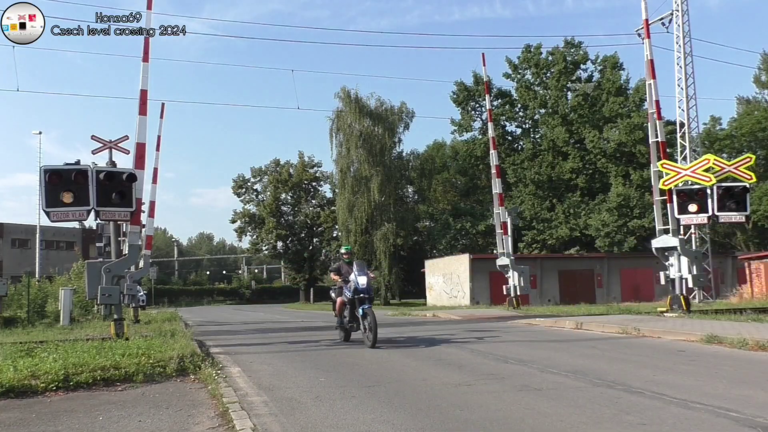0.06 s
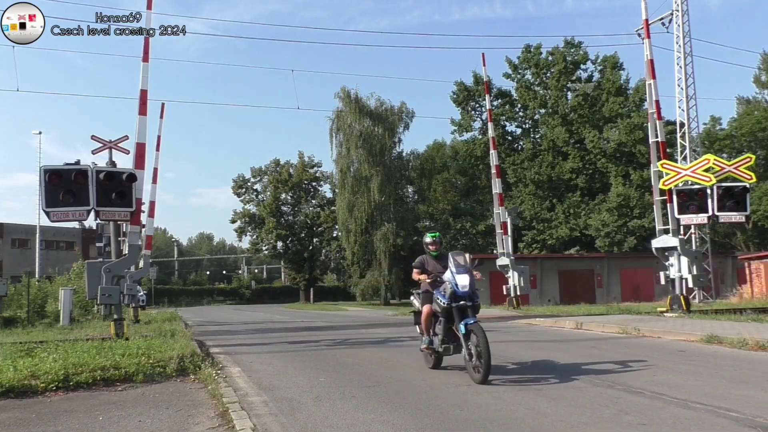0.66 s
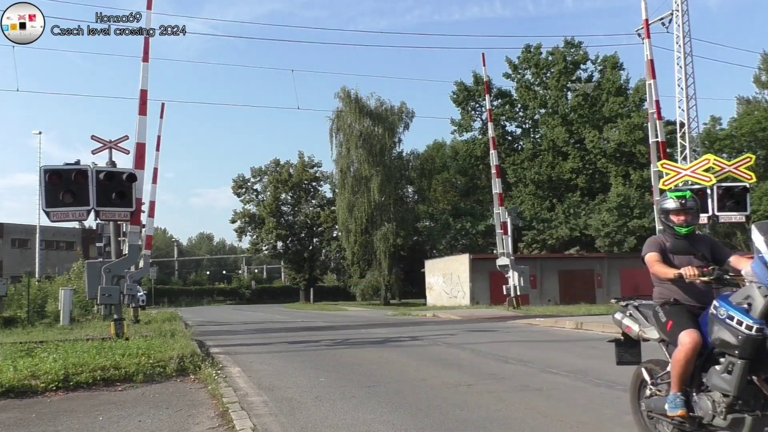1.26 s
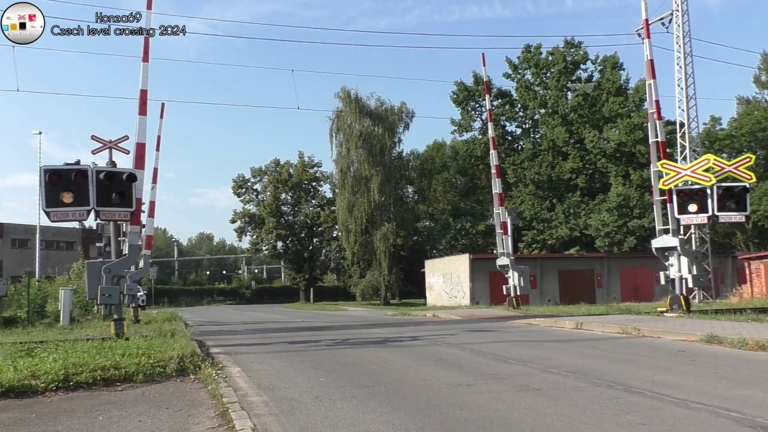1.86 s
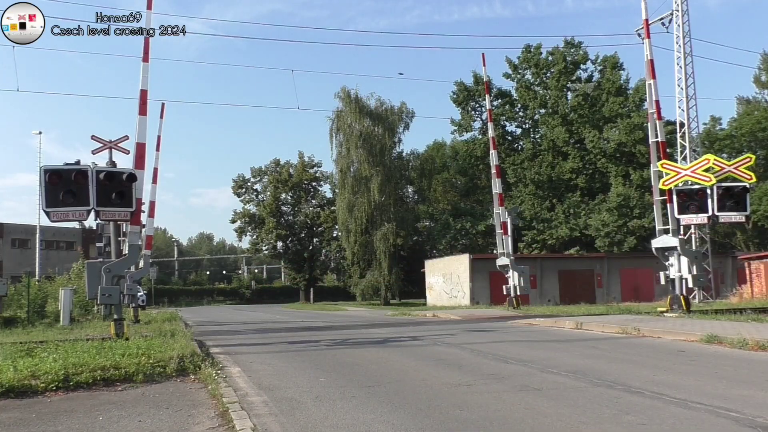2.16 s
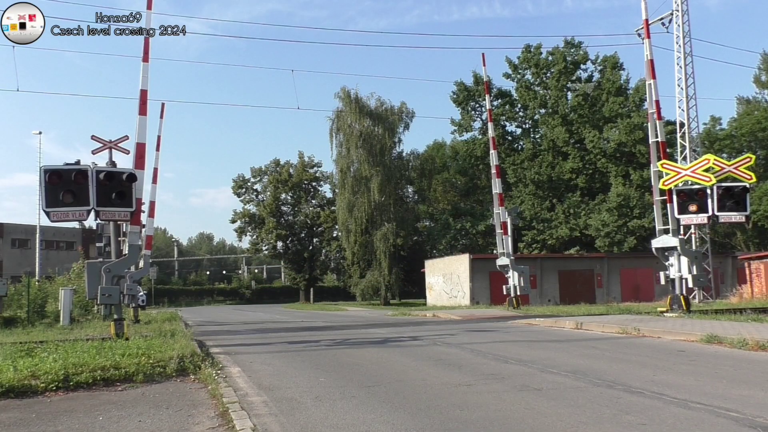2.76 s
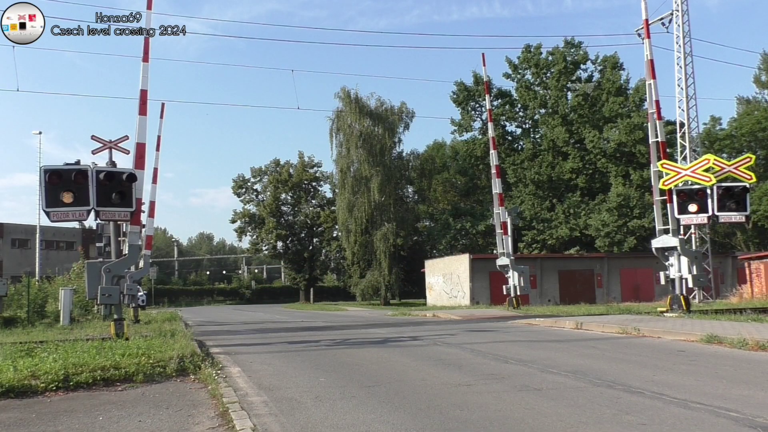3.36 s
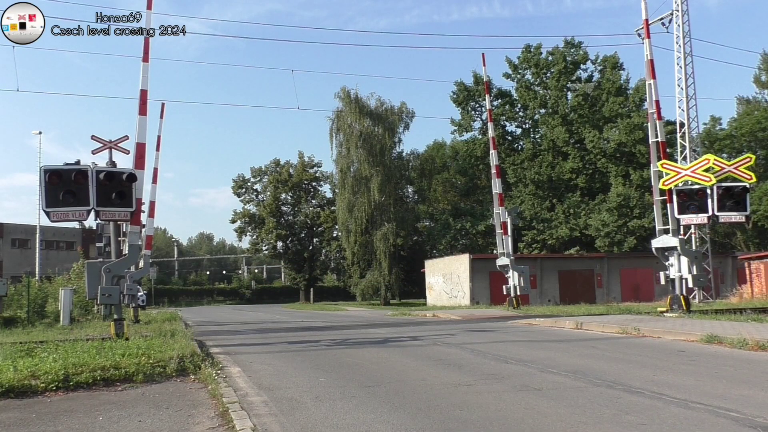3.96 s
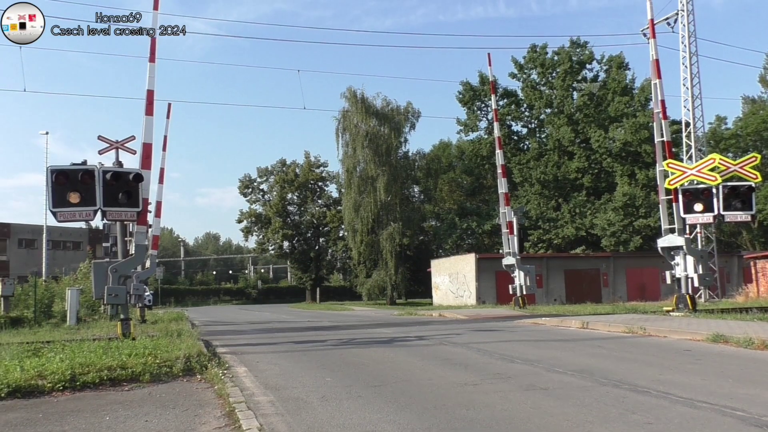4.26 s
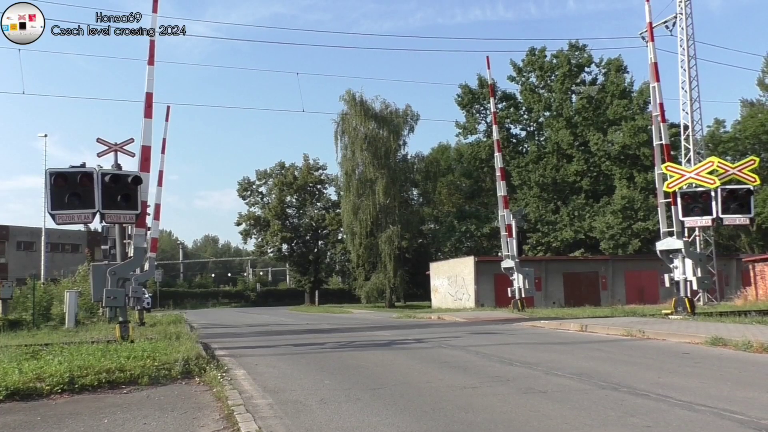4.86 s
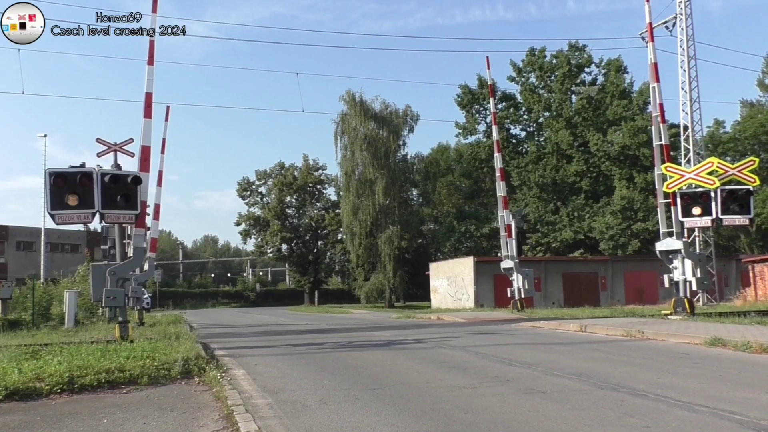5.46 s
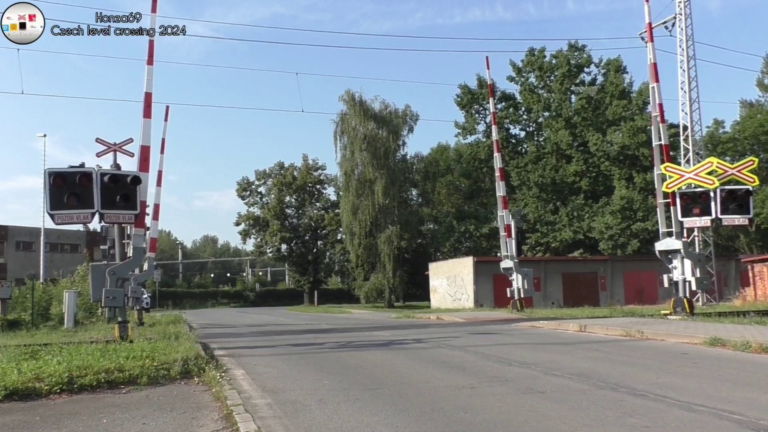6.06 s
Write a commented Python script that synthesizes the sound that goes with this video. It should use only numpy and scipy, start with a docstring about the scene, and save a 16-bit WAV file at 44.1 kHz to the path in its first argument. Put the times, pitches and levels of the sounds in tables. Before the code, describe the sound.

A single-cylinder motorcycle passes close behind a fading car, backfires briefly and rides off while another car approaches from the left.

```python
"""A car rolls by at a level crossing, and just behind it a single-cylinder motorcycle thumps past on the
right, each firing a gas puff that excites the resonances of pipe and silencer; single firings spit.
Near 1.8 s the rider shuts the throttle: unburnt fuel pops in the exhaust and loose metal clinks.
Then the chain takes the load and the bike pulls away, still spitting at first.
From about 3 s the tyre roar of another car grows on the left."""
import sys
import numpy as np
from scipy import signal
from scipy.fft import rfft, irfft, next_fast_len
from scipy.io import wavfile

SR = 44100
rng = np.random.default_rng(int(sys.argv[2]) if len(sys.argv) > 2 else 0)


def transcribe(signal):
    """Save signal, clipped to [-1, 1], as a 16-bit WAV file at the path in sys.argv[1]."""
    frames = np.atleast_2d(signal).T
    limited = np.clip(frames, -1, 1)
    pcm = np.round(limited * 32767).astype(np.int16)
    wavfile.write(sys.argv[1], SR, pcm)


N = 269892
TIME = np.arange(N) / SR

BIKE_PATH = dict(nearest_s=1.846, distance_m=1.93, speed_m_per_s=7.66)
# the rider's hand: t/s, throttle opening (0-1)
THROTTLE = [(0, 0.87), (.36, 0.7), (.47, 0.98), (.75, 0.81), (1.25, 0.85), (1.77, 0.42), (1.815, 0),
            (2.07, 0.1), (2.12, 0.49), (2.35, 0.58), (2.45, 0.71), (2.66, 0.82), (2.92, 1), (3.06, 0.36),
            (3.6, 0.33), (4.02, 0.47), (4.08, 0.73), (4.67, 0.85), (4.73, 0.7), (4.86, 0.36), (4.93, 0.84),
            (6.1, 0.73)]
# modes of the silencer's shell: f/Hz, bandwidth/Hz, level/dB
SHELL_MODES = [(510, 55, -29), (570, 40, -3), (625, 26, 0), (700, 32, -15)]
# modes of the sprockets and chain guard: f/Hz, bandwidth/Hz, level/dB
SPROCKET_MODES = [(2420, 140, -1), (3450, 65, -5), (4070, 61, 0), (4620, 70, -4), (5340, 71, -0.5),
                  (5750, 30, -8), (7770, 110, -7.5), (8650, 100, -11)]
# spectrum of turbulent gas leaving the pipe: f/Hz, level/dB
CRACK_SPECTRUM = [(30, -30), (400, -35), (750, 4), (1200, 8.5), (1600, 8.5), (2300, 0), (4200, -5),
                  (8000, -24), (16000, -39)]


def exhaust(fired, open_ms=1.783, shut_ms=5.65, shut_db=-11.5, sound_m_per_s=343):
    """Pulse excitation: each firing sends a puff down the pipe; changing delay gives a Doppler shift."""
    # puff strength on full throttle: t/s, level/dB
    full_throttle = [(.05, -12.5), (.2, -11.5), (.36, -7.5), (.62, -11.5), (1.25, -8.5), (1.55, -8.5),
                     (1.77, -10), (1.82, 2), (1.96, -2), (2.15, -12), (2.66, -14), (2.9, -17.5),
                     (3.08, -23), (3.2, -19), (3.55, -21), (3.68, -17.5), (3.85, -18), (3.99, -19),
                     (4.08, -17.5), (4.8, -19), (5.0, -17), (6.1, -17)]
    shut = 1 - in_time(THROTTLE, fired)[0]
    facing = passing(**BIKE_PATH, at=fired)[2]
    chance = rng.standard_normal((len(fired), 2))
    # on a shut throttle the puffs are weaker, more ragged and longer
    level_db = in_time(full_throttle, fired)[0] + shut * (shut_db + 1.5 * chance[:, 0])
    width_ms = open_ms * (shut_ms / open_ms) ** shut * (1 + 0.042 * chance[:, 1])
    width_ms *= 1 + 0.024 * facing  # the pipe points backwards: duller from ahead
    travel_s = passing(**BIKE_PATH)[0] / sound_m_per_s
    sent = fired - np.interp(fired, TIME, travel_s)
    pipe = pipe_and_silencer(puff_train(sent, level_db, width_ms))
    shell, clicks = wavefronts(sent, fired)
    pipe, shell = later(pipe + clicks, travel_s), later(shell, travel_s)
    scattered = surroundings(from_db(-23) * pipe + from_db(-10) * shell)
    return panned(pipe, 1.5) + panned(shell, 0) + scattered


def firing_times():
    """Phase is the integral of frequency: one firing for each completed engine cycle."""
    # firing rate: t/s, f/Hz
    firing_rate = [(0.0, 16.39), (0.26, 11.8), (0.5, 21.79), (0.57, 24.0), (0.76, 21.27), (1.2, 23.72),
                   (1.75, 26.57), (1.8, 20.63), (1.88, 22.85), (1.96, 19.46), (2.16, 17.4), (2.31, 20.94),
                   (2.35, 16.66), (2.48, 19.56), (2.64, 17.85), (2.68, 24.55), (2.72, 18.78), (2.96, 20.3),
                   (3.06, 14.65), (3.17, 19.99), (3.41, 19.08), (3.65, 19.29), (3.9, 18.72), (4.25, 18.58),
                   (4.59, 19.06), (4.76, 17.54), (5.06, 20.31), (5.16, 18.72), (5.4, 19.02), (6.12, 19.7)]
    cycles = np.cumsum(in_time(firing_rate)[0]) / SR
    return np.interp(np.arange(1, int(cycles[-1]) + 1), cycles, TIME)


def pipe_and_silencer(puffs, echo_s=0.00816, drone_lag_s=0.00791):
    """Reflection and resonance: puffs bounce along the pipe and set the enclosed air ringing."""
    # the silencer as the bike turns and recedes: t/s, echo share, drone/dB, boom/dB, honk/dB
    balance = [(.3, 0.036, 6.5, -9, -31), (.6, 0.63, 3, -36, -39), (1.3, 0.18, 1, -51, -30),
               (1.78, 0.51, 3, -17, -28), (2.15, 0.19, 4, -2, -20), (2.5, 0.19, 3.5, -7, 0),
               (2.9, 0.024, 0, -12, -2), (3.2, 0.18, 4, -1, 0), (4.15, 0.39, 15.5, 9, -11),
               (6.1, 0.27, 12, 5, -4)]
    # resonances, each: f/Hz, bandwidth/Hz, level/dB
    pipe_modes = [(121.3, 12.4, -12), (224.3, 9.8, -17), (265, 19.2, -4.5), (351, 11, -12)]
    cavity_mode = [(81, 30, 1)]  # the silencer's air volume
    tailpipe_mode = [(329, 76, 3)]
    mouth_mode = [(216, 56, -1.5)]  # the pipe's open end
    deep_bass_notch = [(49, 19, -4.5)]  # thins the thump's deepest bass around 49 Hz
    echo, drone_db, boom_db, honk_db = in_time(balance)
    drone = from_db(drone_db) * later(resonate(puffs, pipe_modes), drone_lag_s)
    boom = from_db(boom_db) * resonate(puffs, cavity_mode)
    honk = from_db(honk_db) * resonate(puffs, tailpipe_mode)
    echoes = echo * later(puffs + 0.86 * echo * later(puffs, echo_s), echo_s)
    pipe = puffs + resonate(puffs, mouth_mode) + echoes + drone + boom + honk
    return cut(pipe - resonate(pipe, deep_bass_notch), 72, "high")


def wavefronts(sent, fired, knock_lead_s=0.0011, click_lag_s=0.00032):
    """Impulse response: each puff's steep front knocks the shell into ringing and leaves as a click."""
    # t/s, knock level/dB, click level/dB, click half-width/ms
    fronts = [(.5, -25, -46, 0.67), (1.05, -21, -41, 0.68), (1.18, -29, -24, 0.47), (1.4, -18, -29, 0.35),
              (1.54, -8.5, -18.5, 0.68), (1.68, -9.5, -32, .9), (1.86, -14, -37, .5),
              (2.08, -21.5, -44, 0.42), (2.29, -17, -47, 0.61), (2.45, -33, -34, .5), (2.7, -38, -30, 0.42),
              (2.92, -38, -33, 0.36), (3.07, -47, -42, 0.41), (3.5, -57, -42, 0.6), (3.8, -50, -33.5, 0.73),
              (4.15, -36, -39, 0.45), (6.1, -41, -44, 0.51)]
    knock_db, click_db, click_ms = in_time(fronts, fired)
    uneven_db = rng.standard_normal((len(fired), 2))
    knocks = puff_train(sent - knock_lead_s, knock_db + uneven_db[:, 0], width_ms=np.ones(len(fired)))
    clicks = puff_train(sent + click_lag_s, click_db + uneven_db[:, 1], click_ms, lean=0.4)
    return resonate(knocks, SHELL_MODES), clicks


def afterfire_pops():
    """Impulsive combustion: unburnt fuel goes off in the pipe and excites silencer chamber and shell."""
    # t/s, level/dB, half-width/ms, then relative to that level: bark/dB, shell/dB, snap/dB
    ignitions = [(0.1322, -14, 1.5, -11, -9, -26), (2.0081, -27, 1.24, 17, 8, -7),
                 (2.0158, -16.5, 0.76, 11.5, -11, -14.5), (2.1227, -34, 0.92, 0, 23, -30),
                 (2.234, -31, 0.51, 4, 19, -32), (3.3325, -25, 1.6, -10, -15, -27),
                 (3.3393, -14, 1.35, -8, -25, -12), (3.5377, -28.5, 1.8, 2, 5, -32),
                 (3.548, -22.5, 1.9, 0, -8, -36), (3.910, -19, 1.9, -1, -2, -33)]
    # the chamber's quickly damped bark: f/Hz, bandwidth/Hz, level/dB
    chamber_mode = [(545, 86, 0)]
    # a pop's sharp edge: f/Hz, level/dB
    snap_spectrum = [(30, -33), (700, 0), (1300, 4), (2100, 5), (3200, -6.5), (5000, -17), (8000, -23),
                     (16000, -52)]
    times, level_db, width_ms, bark_db, shell_db, snap_db = np.transpose(ignitions)
    pulses = cut(puff_train(times, level_db, width_ms, lean=1.2), 70, "high")
    shell = resonate(puff_train(times, level_db + shell_db, width_ms), SHELL_MODES)
    barks = resonate(puff_train(times, level_db + bark_db, width_ms), chamber_mode)
    pops = pulses + shell + barks
    snaps = noise(snap_spectrum) * bursts(times + 0.00026, level_db + snap_db, 0.00073, 0.0023)
    return panned(pops + snaps, 0) + from_db(-22) * surroundings(pops)


def exhaust_spits(rise_s=0.00057):
    """Turbulence: single firings crack and hiss, under load and on the shut throttle; metal rings."""
    # t/s, hiss level/dB, crack level/dB
    spits = [(1.177, -48, -30.5), (1.301, -47, -28.5), (1.341, -52, -29), (1.502, -42, -36),
             (1.543, -39, -33), (1.583, -45, -36), (1.659, -54, -42), (1.823, -55, -32), (1.868, -37, -33),
             (1.9142, -42, -32), (1.9597, -27, -27.5), (2.283, -41, -44), (2.39, -42, -59),
             (2.442, -40, -47), (2.548, -36.5, -42), (2.656, -39.5, -39), (2.704, -45, -40),
             (2.753, -41, -39), (2.806, -46, -37), (2.856, -42.5, -43), (2.906, -50, -34)]
    # f/Hz, level/dB
    hiss_spectrum = [(30, -33), (700, 9.5), (1300, 12), (2000, -1.5), (3800, -0.5), (5600, -1.5),
                     (7500, -2), (10000, -3.5), (13500, -6.5), (16000, -25)]
    times, hiss_db, crack_db = np.transpose(spits)
    hiss = noise(hiss_spectrum) * bursts(times, hiss_db, rise_s, decay_s=0.011)
    ring = from_db(-3) * resonate(hiss, SPROCKET_MODES)
    cracks = noise(CRACK_SPECTRUM) * bursts(times + 0.0014, crack_db, rise_s, decay_s=0.0035)
    return panned(hiss + ring + cracks, -5)


def engine_noise(fired):
    """Turbulence: valves and gas rasp around each firing, and the puff leaves with a crack."""
    # f/Hz, level/dB
    rasp_spectrum = [(30, -7), (700, 23), (1500, -11), (3800, -2), (5600, -2), (7500, -5.5), (10000, -2.5),
                     (13500, -5.5), (16000, -41)]
    uneven_db = 2.2 * rng.standard_normal((len(fired), 2))
    rasp_db = part_level(fired, db=-38, falloff=0.76, front_db=5, shut_db=-2.5) + uneven_db[:, 0]
    crack_db = part_level(fired, db=-35.5, falloff=0.99, front_db=8.5, shut_db=-13.5) + uneven_db[:, 1]
    rasp = noise(rasp_spectrum) * bursts(fired - 0.0087, rasp_db, rise_s=0.0018, decay_s=0.014)
    crack = noise(CRACK_SPECTRUM) * bursts(fired - 0.0005, crack_db, rise_s=0.0049, decay_s=0.012)
    return rasp + crack


def chain(slaps_per_s=30, rattle_db=3):
    """Impact noise: links clatter over the sprockets, with single slaps, and set the metal ringing."""
    # t/s, level/dB
    chain_level = [(.5, -61), (1.1, -73), (1.35, -64), (1.62, -56), (1.85, -56.5), (2.275, -56.5),
                   (2.286, -47), (2.37, -48.5), (2.65, -53), (2.93, -54.5), (3.04, -65), (3.7, -59),
                   (6.1, -65.5)]
    # f/Hz, level/dB
    link_spectrum = [(30, -42), (1500, -8), (2200, -0.5), (3700, 0), (5700, 0), (7000, -1), (8500, -2),
                     (10500, -10), (16000, -10)]
    chance = rng.random((int(slaps_per_s * TIME[-1]), 2))
    slap_db = -2.5 + 4 * (2 * chance[:, 1] - 1)
    slaps = bursts(chance[:, 0] * TIME[-1], slap_db, rise_s=0.00057, decay_s=0.0058)
    clatter = from_db(rattle_db * flutter(per_s=200))
    links = (clatter + 2 * slaps) * noise(link_spectrum)
    return from_db(in_time(chain_level)[0]) * rms_one(links + resonate(links, SPROCKET_MODES))


def clinks(rise_s=0.00055):
    """Modal ringing: loose metal, jolted by the crossing and the pops, chatters and jingles on."""
    # t/s, level/dB, frequency ratio
    jolts = [(1.866, -26.5, 0.99), (1.891, -35, 1.1), (2.012, -33, 0.93), (2.058, -34.5, 0.95),
             (2.14, -38.5, 0.85), (2.194, -37.5, 0.93), (3.346, -45, 0.7), (3.562, -50, 0.65)]
    # f/Hz, bandwidth/Hz, level/dB
    metal_modes = [(8050, 350, -12), (9200, 450, -0.5), (10000, 650, -3), (11100, 700, -9),
                   (13200, 1500, -14)]
    out = 0
    for s, level_db, ratio in jolts:
        chatter = bursts([s], [level_db], rise_s, decay_s=0.0058)
        jingle = bursts([s], [level_db - 15], rise_s, decay_s=0.064)
        modes = [(hz * ratio, width, db) for hz, width, db in metal_modes]
        out = out + resonate(rng.standard_normal(N) * (chatter + jingle), modes)
    return out


def bike_tyres():
    """Directional radiation: the bike's tread roar carries more strongly forwards."""
    # f/Hz, level/dB
    tread_spectrum = [(30, -28), (60, -19), (120, 2.5), (400, 8), (800, -2), (1500, -2), (2500, -7),
                      (4200, -11), (6500, -20.5), (10500, -19), (13500, -22), (16000, -28)]
    level_db = part_level(TIME, db=-41, falloff=0.65, front_db=7, shut_db=-1)
    return tyres(level_db, tread_spectrum, patchy_db=1.5)


def first_car(falloff=1.31, fade_db_per_s=2):
    """Spreading loss: a car already alongside fades, its tyres duller from behind and with distance."""
    # f/Hz, level/dB
    tread_spectrum = [(30, -4), (80, 11), (250, -1.5), (500, -1.5), (1000, -1.5), (1500, -7.5), (2200, -12),
                      (3200, -17.5), (5000, -30), (9000, -36.5), (16000, -43)]
    _, loss_db, facing = passing(nearest_s=0.081, distance_m=3.25, speed_m_per_s=11.6)
    level_db = -26 - falloff * loss_db - fade_db_per_s * TIME
    return panned(tyres(level_db, tread_spectrum, tilt_db=facing - 0.015 * loss_db), -1.5)


def second_car(tilt_db_per_s=0.5):
    """An approaching source: tyre roar on the left grows louder and brighter as the car nears."""
    # t/s, level/dB
    approach = [(2.0, -77), (3.1, -57), (3.37, -54), (3.44, -46), (3.57, -53), (4.02, -46.5),
                (4.045, -41.5), (4.65, -40), (4.85, -37.5), (5.05, -37.5), (5.15, -37), (5.3, -39.5),
                (5.6, -38), (5.83, -37), (5.98, -38.5), (6.1, -36.5)]
    # f/Hz, level/dB
    tread_spectrum = [(30, -10), (100, 8.5), (300, 7.5), (450, -4.5), (850, -8.5), (1200, -2), (1400, 4.5),
                      (1570, -3.5), (1800, -2), (1970, 2), (2180, 0.5), (2400, -5.5), (2620, -10),
                      (2860, -4.5), (3200, -12.5), (3500, -11), (4000, -19.5), (5400, -22), (7000, -32),
                      (11000, -46)]
    tilt_db = 0.54 - tilt_db_per_s * (TIME[-1] - TIME)
    return panned(tyres(in_time(approach)[0], tread_spectrum, tilt_db), 4.5)


def tyres(level_db, spectrum, tilt_db=0.0, patchy_db=1.0):
    """Rolling noise in five bands, each tilted against the last; asphalt patches shift the colour."""
    roar, out = noise(spectrum), 0
    for hz in (800, 1700, 2600, 5000):
        band = signal.sosfiltfilt(signal.butter(2, hz, fs=SR, output="sos"), roar)
        out = out + band * from_db(patchy_db * flutter(per_s=13))
        roar = (roar - band) * from_db(tilt_db)
    return from_db(level_db) * (out + roar)


def surroundings(x, t60_s=0.014, onset_s=0.00608):
    """Scattering: walls and trees return a short dull tail to each side; long waves pass them by."""
    t = TIME[:SR // 2]
    tail = cut(cut(rng.standard_normal((2, len(t))), 1800, "low"), 420, "high")
    tail *= from_db(-60 * t / t60_s) * (t > onset_s)
    tail /= np.sqrt(np.sum(tail ** 2) / 2)
    return signal.fftconvolve(x[None], tail, axes=1)[:, :N]


def open_air():
    """Ambient noise: a steady low rumble with a faint hiss."""
    # f/Hz, level/dB
    air_spectrum = [(25, 10), (45, 20), (70, 28), (200, 21), (500, 7.5), (1500, -1.5), (3000, -37),
                    (6000, -11.5), (8500, -12.5), (11000, -19), (16000, -25)]
    return from_db(-44) * noise(air_spectrum)


def passing(nearest_s, distance_m, speed_m_per_s, at=TIME):
    """Spherical spreading from a straight path: range/m, loss/dB, facing (1 head-on, -1 from behind)."""
    to_go_m = speed_m_per_s * (nearest_s - at)
    range_m = np.hypot(distance_m, to_go_m)
    return range_m, 20 * np.log10(range_m / distance_m), to_go_m / range_m


def part_level(at, db, falloff, front_db, shut_db):
    """A bike part's level/dB from spreading (falloff 1 = inverse distance), directivity and throttle."""
    _, loss_db, facing = passing(**BIKE_PATH, at=at)
    shut = 1 - in_time(THROTTLE, at)[0]
    return db - falloff * loss_db + front_db * facing + shut_db * shut


def puff_train(times, level_db, width_ms, lean=1.45):
    """A bell-shaped gas puff radiates as its curvature, skewed by the phase angle lean/rad."""
    out = np.zeros(N)
    for s, db, half_width in zip(times, level_db, width_ms):
        near = slice(*np.searchsorted(TIME, [s - .04, s + .04]))
        u = (TIME[near] - s) * 1000 / max(half_width, .2)
        even, odd = 1 - 3 * u ** 2, 3 * u - u ** 3
        out[near] += from_db(db) * (np.cos(lean) * even + np.sin(lean) * odd) / (1 + u ** 2) ** 3
    return out


def bursts(times, peak_db, rise_s, decay_s):
    """An envelope of exponential growth up to each moment and exponential decay after it."""
    out = np.zeros(N)
    for s, db in zip(times, peak_db):
        near = slice(*np.searchsorted(TIME, [s - .02, s + 8 * decay_s]))
        t = TIME[near] - s
        out[near] += from_db(db) * np.exp(np.minimum(t / rise_s, -t / decay_s))
    return out


def resonate(x, modes):
    """Superposition of damped resonators, each with its own gain at resonance."""
    out = 0
    for hz, width, db in modes:
        r = np.exp(-np.pi * width / SR)
        feedback = [1, -2 * r * np.cos(2 * np.pi * hz / SR), r * r]
        out = out + from_db(db) * (1 - r * r) / 2 * signal.lfilter([1, 0, -1], feedback, x + 1e-18)
    return out


def noise(spectrum):
    """Partially coherent stereo noise of unit power, most alike in the bass and the top."""
    # likeness of left and right: f/Hz, correlation (0-1)
    coherence = [(30, 0.97), (300, 1), (650, 0.88), (1400, 0.63), (3000, 0.65), (5000, 0.85), (8000, 1),
                 (16000, 1)]
    size = next_fast_len(N)
    log_hz = np.log(np.maximum(np.arange(size // 2 + 1) * SR / size, 1))
    curves = np.transpose(spectrum), np.transpose(coherence)
    db, alike = [np.interp(log_hz, np.log(hz), values) for hz, values in curves]
    mid, side = rfft(rng.standard_normal((2, size)))
    both = np.sqrt(1 + alike) * mid + np.sqrt(1 - alike) * side * np.array([[1], [-1]])
    return rms_one(irfft(from_db(db) * both, size)[:, :N])


def flutter(per_s):
    """Random modulation with a spread of about 1."""
    knots = rng.standard_normal(int(per_s * TIME[-1]) + 2)
    return np.interp(TIME * per_s, np.arange(len(knots)), knots)


def panned(x, pan_db):
    """Constant-power panning; a positive level difference favours the left."""
    sides = from_db(np.array([pan_db, -pan_db]) / 2).reshape(2, -1)
    return x * sides / np.sqrt(np.mean(sides ** 2, axis=0))


def cut(x, hz, kind):
    """Second-order high- or low-pass."""
    return signal.sosfilt(signal.butter(2, hz, kind, fs=SR, output="sos"), x)


def later(x, seconds):
    """Fractional delay by interpolation."""
    return np.interp(TIME - seconds, TIME, x, left=0)


def in_time(rows, at=TIME):
    """Linear interpolation of each column at the given times."""
    times, *columns = np.transpose(rows)
    return [np.interp(at, times, column) for column in columns]


def from_db(db):
    """Decibels to amplitude ratio."""
    return 10 ** (np.asarray(db) / 20)


def rms_one(x):
    """Normalisation to unit power."""
    return x / np.sqrt(np.mean(x ** 2) + 1e-20)


def scene():
    """Superposition of the motorcycle, two cars and the open air."""
    fired = firing_times()
    rolling = bike_tyres()
    bike = exhaust(fired) + afterfire_pops() + exhaust_spits()
    noisy_parts = engine_noise(fired) + chain() + clinks() + rolling
    nearness = from_db(-passing(**BIKE_PATH)[1])
    bike += panned(noisy_parts, -3.5 * nearness)  # furthest right when nearest
    return bike + second_car() + first_car() + open_air()


def record(dry, dip_start_s=4.0275, dip_end_s=4.044, fade_s=0.002, top_hz=15800):
    """Band limiting: microphones lose deep bass, the left sooner; the level dips; the top is cut."""
    left, right = cut(cut(dry, 38, "high"), 38, "high")
    left = from_db(-0.88) * signal.lfilter(*signal.butter(1, 62, "high", fs=SR), left)
    outside_dip_s = np.maximum(dip_start_s - TIME, TIME - dip_end_s)
    gain = np.clip(outside_dip_s / fade_s + .5, from_db(-24), 1)
    steep_low_pass = signal.ellip(10, .1, 90, top_hz, fs=SR, output="sos")
    return signal.sosfilt(steep_low_pass, np.array([left, right]) * gain)


dry = scene()
out = record(dry)
transcribe(out)
```